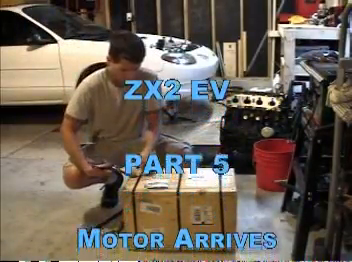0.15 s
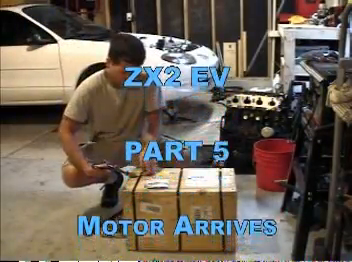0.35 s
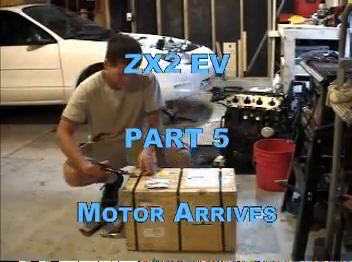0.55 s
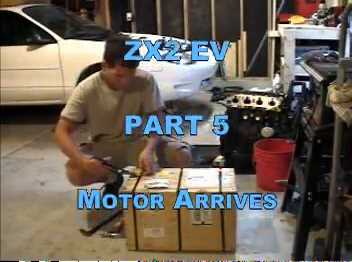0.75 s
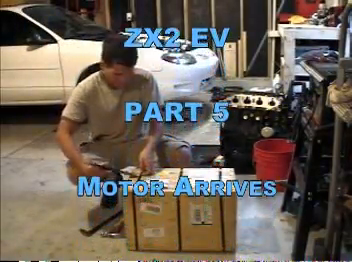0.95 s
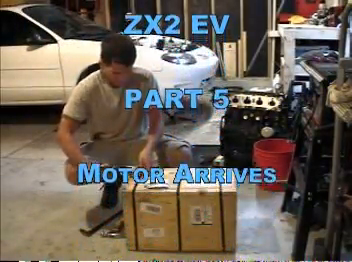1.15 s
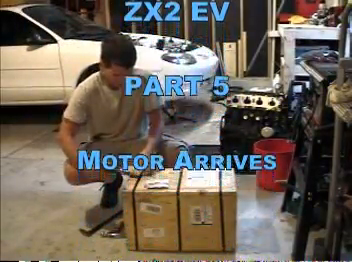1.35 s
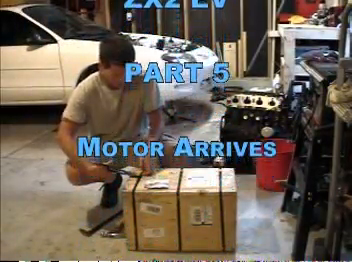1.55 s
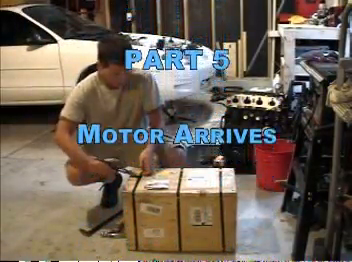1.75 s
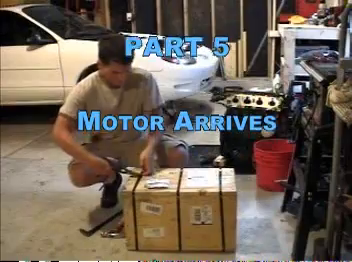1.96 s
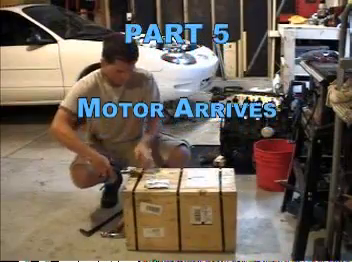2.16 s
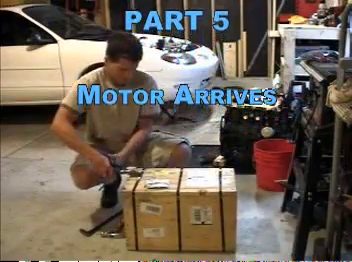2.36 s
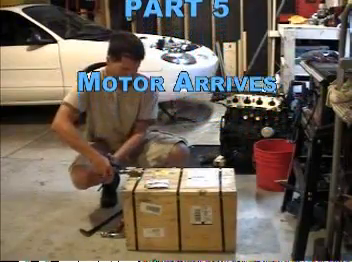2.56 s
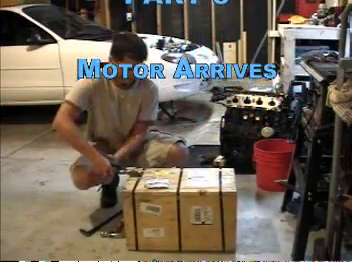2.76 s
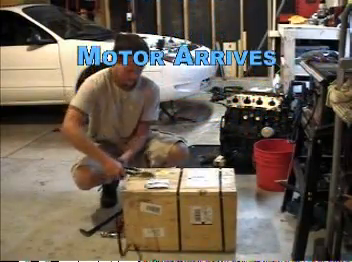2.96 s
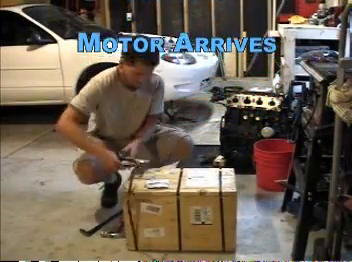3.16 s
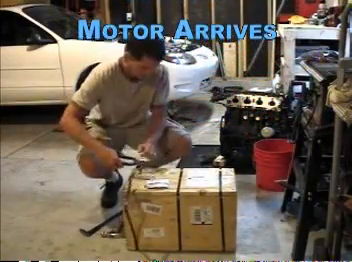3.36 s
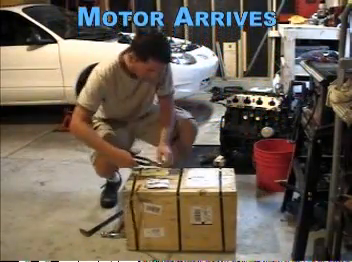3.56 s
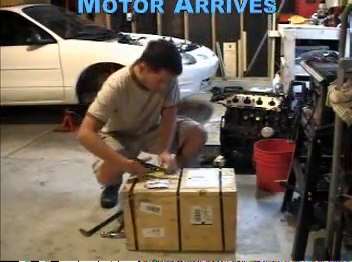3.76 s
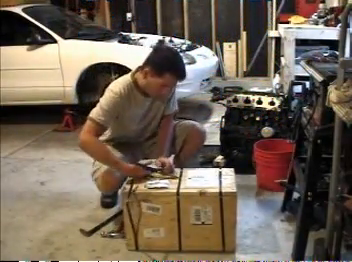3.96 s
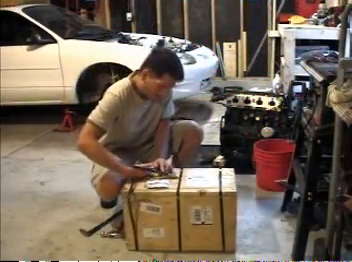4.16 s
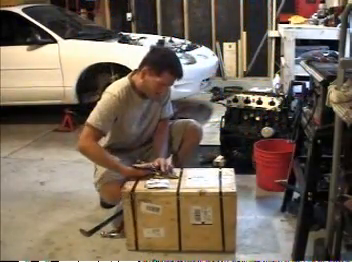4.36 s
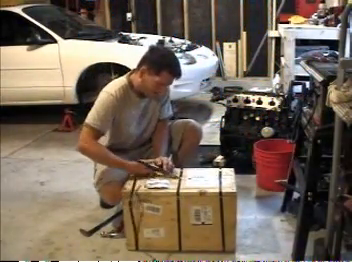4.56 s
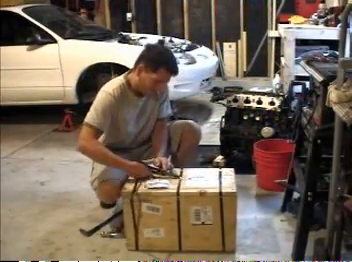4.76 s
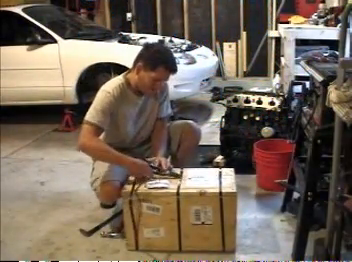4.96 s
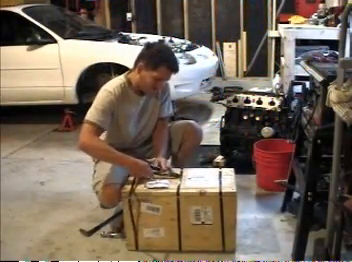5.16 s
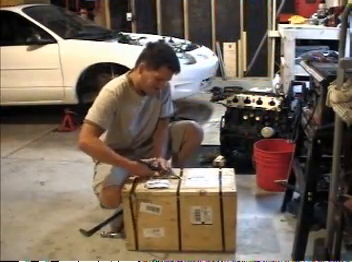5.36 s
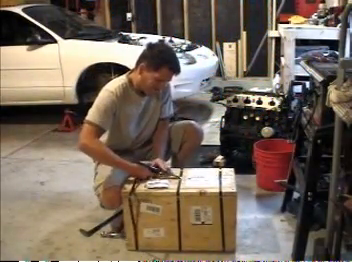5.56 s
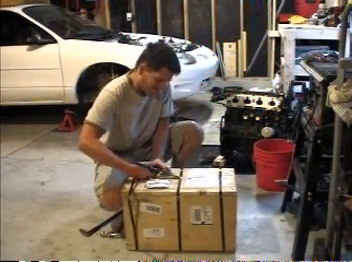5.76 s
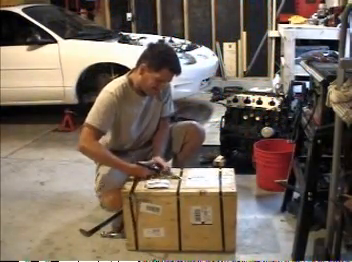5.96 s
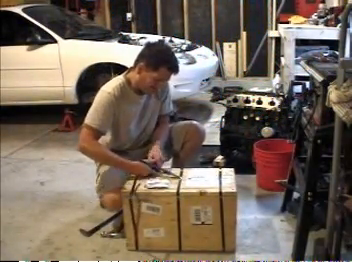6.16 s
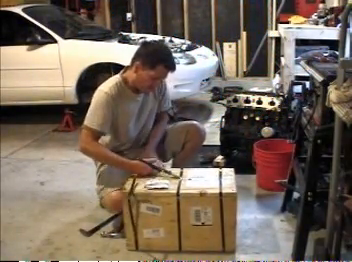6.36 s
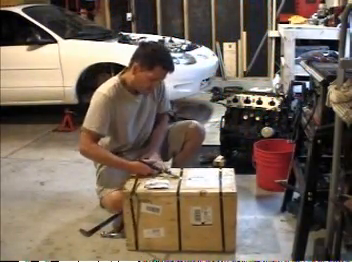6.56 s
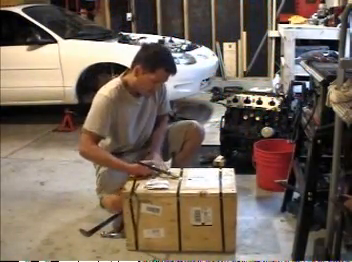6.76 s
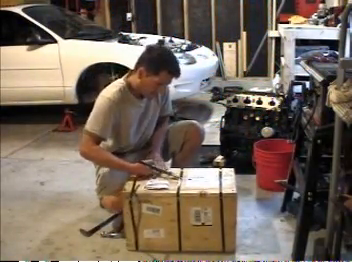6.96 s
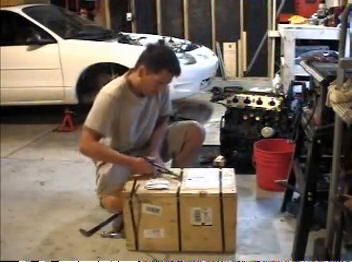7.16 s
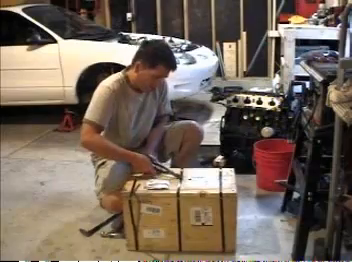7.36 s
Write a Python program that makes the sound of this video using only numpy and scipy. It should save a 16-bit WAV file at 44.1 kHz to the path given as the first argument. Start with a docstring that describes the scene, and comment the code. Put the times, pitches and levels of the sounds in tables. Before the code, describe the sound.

Steady hiss, faint wavering hum and a thin high camera whine sit beneath close garage work. A tool clicks and briefly rings against steel, hands rub hollow plywood, then a tensioned strap lets go with a distorted crack, a push of air and whipping metallic rattle. Bright clacks and scraping come after, then small knocks, a quieter lull, and a sharp click with strap scraping at the end. Short hard-walled reverberation.

```python
"""Steel straps come off a plywood crate by hand tool in a concrete garage: bursts of micro-impacts excite panels,
steel and walls as knocks, clicks and scuffs. Stick-slip noise makes the rubbing and scraping, decaying sines the
ringing tool. One strap snaps loud enough to overload the tape camera, pushes the air and thrashes as resonant
rattle. Behind lie room tone, hiss, a low hum and the camera motor's thin whine; a comb of notches at the head
drum's rate is cut into everything but the whine and the push of air."""
import sys
import numpy as np
from scipy import signal
from scipy.fft import rfft, irfft, next_fast_len
from scipy.io import wavfile
from scipy.ndimage import map_coordinates

SR = 44100
rng = np.random.default_rng(int(sys.argv[2]) if len(sys.argv) > 2 else 0)


def digitize_waveform(pressure):
    """Quantize a signal to 16-bit integers and store it at the path in sys.argv[1].

    Rows of a 2-D input are taken as channels; values are limited to [-1, 1].
    """
    field = np.atleast_2d(pressure).T
    bounded = np.clip(field, -1, 1)
    quanta = np.round(bounded * 32767).astype(np.int16)
    wavfile.write(sys.argv[1], SR, quanta)


N = 326340  # length [samples]
SNAP_S = 2.91  # the strap lets go


def amp(db):
    """Decibels to gain."""
    return 10 ** (np.asarray(db) / 20)


def unit(x):
    """Scale to rms 1."""
    return x / np.sqrt(np.mean(x ** 2) + 1e-20)


def along(points, hz):
    """Read (frequency [Hz], value) points on a log frequency axis."""
    f, values = np.transpose(points)
    return np.interp(np.log(hz + 1), np.log(f + 1), values)


def curves(rows):
    """One value per sample for each column after the time."""
    times, *columns = np.transpose(rows)
    return [np.interp(np.arange(N) / SR, times, column) for column in columns]


def wobble(rate):
    """A smooth random curve through `rate` knots a second."""
    knots = rng.standard_normal(int(N * rate / SR) + 4)
    return map_coordinates(knots, [np.arange(N) * rate / SR])


def filtered(x, response):
    """Multiply the spectrum of x by a complex response of frequency."""
    n = x.shape[-1]
    padded = next_fast_len(n + 8192)
    spectrum = rfft(x, padded) * response(np.fft.rfftfreq(padded, 1 / SR))
    return irfft(spectrum, padded)[..., :n]


def resonance(f, hz, width):
    """Causal resonance of peak gain 1, its width in Hz."""
    return 1j * f * width / (hz * hz - f * f + 1j * f * width)


def spread(pair, spectrum):
    """Colour two unrelated signals and mix them until left and right are as alike as at the two microphone ports."""
    # likeness of the two ports: (frequency [Hz], left-right correlation)
    alike = [(60, 0.99), (180, 1.0), (550, 0.99), (1650, 0.96), (4970, 0.86), (15000, 0.57)]

    def mid_side(hz):
        angle = np.arccos(np.clip(along(alike, hz), -1, 1)) / 2
        return amp(along(spectrum, hz)) * [np.cos(angle), np.sin(angle)]

    mid, side = filtered(pair, mid_side)
    return np.array([mid + side, mid - side])


def room_tone():
    """Steady coloured noise: the garage's room tone together with the camera's hiss."""
    # (frequency [Hz], relative level [dB per Hz])
    colour = [(12, -35), (20, -4.5), (97, 3.5), (159, 1), (226, -0.5), (305, 0), (751, -14.5),
              (1440, -10.5), (1950, -16), (4420, -17.5), (5340, -10), (6290, -23), (9730, -19),
              (11200, -39), (13500, -34)]
    level_db = -51.5  # rms
    return amp(level_db) * unit(spread(rng.standard_normal((2, N)), colour))


def hum():
    """A low sine that comes and goes, its pitch wavering about 105.5 Hz."""
    # (time [s], peak level [dB])
    swells = [(0.0, -51.5), (0.45, -75), (0.9, -54), (1.15, -74), (1.96, -49.5), (2.31, -52), (2.45, -84),
              (3.6, -56), (4.2, -57), (4.9, -59.5), (5.05, -62), (5.7, -50), (5.93, -62), (6.43, -47.5),
              (7.4, -58)]
    hz = 105.5 + 1.7 * wobble(7.9)
    return amp(curves(swells)[0]) * np.sin(2 * np.pi * np.cumsum(hz) / SR)


def whine():
    """Thin steady lines of the camera's drum motor, each wavering slightly in level."""
    # motor lines: (frequency [Hz], peak level before wavering [dB])
    lines = [(4194, -75), (4441, -74), (4635, -75), (4797, -72), (5017, -71), (5184, -66), (5243, -60),
             (5394, -62), (5545, -70), (5577, -71), (5771, -68), (6126, -77), (6293, -78), (6745, -69),
             (7165, -78), (7494, -79), (7623, -75), (8070, -68), (8091, -68), (8172, -72), (8393, -75),
             (8624, -69), (9222, -79), (9410, -71), (9507, -77), (9593, -75), (9889, -81), (10191, -75),
             (10492, -78), (10788, -79)]
    t = np.arange(N) / SR
    out = np.zeros((2, N))
    for hz, db in lines:
        phase = rng.normal(0, 0.71, (2, 1))  # each side has its own [rad]
        out += amp(db + 1.2 * wobble(4.8)) * np.sin(2 * np.pi * hz * t + phase)
    return out


def friction(spectrum, rate, grain_db, lumpy_db):
    """Stick-slip grains of scattered size, `rate` a second, over a noise bed for their reverberation; rms 1."""
    present = rng.random(N) < rate / SR
    size = amp(grain_db * np.minimum(rng.exponential(size=N), 3))
    grains = present * size * rng.standard_normal((2, N))
    bed = rng.standard_normal((2, N))
    return unit(amp(lumpy_db * wobble(25)) * spread(0.79 * unit(grains) + bed, spectrum))


def handling():
    """Hands and tool rub the plywood and drag the strap by friction; the lashing strap does both too."""
    # hands busy on the crate: (time [s], plywood rubbing [dB], strap scraping [dB])
    hands = [(0.0, -56.5, -54), (0.8, -62, -58), (1.21, -51, -56), (1.63, -60.5, -54), (1.96, -40, -53),
             (2.1, -42.5, -59), (2.33, -50, -53), (2.9, -64, -60), (3.5, -73, -81), (3.71, -35.5, -34),
             (3.9, -40.5, -42.5), (4.1, -61, -61), (4.3, -53, -51), (4.68, -47, -53.5), (4.8, -43.5, -38),
             (4.9, -45.5, -45), (5.09, -41.5, -43.5), (5.27, -52, -60), (6.18, -55.5, -52), (6.3, -45, -49),
             (6.47, -52.5, -57.5), (7.14, -52, -54), (7.19, -46, -29.5), (7.32, -35.5, -39),
             (7.4, -38, -36)]
    # rubbed plywood: (frequency [Hz], relative level [dB per Hz])
    plywood = [(71, -78), (120, -20.5), (223, -4), (296, -3), (362, -1), (542, -5), (835, -4), (3000, -33),
               (3900, -63), (6600, -120)]
    # scraped steel strap: (frequency [Hz], relative level [dB per Hz])
    steel = [(350, -18), (600, -9), (1280, 3), (1650, -2), (2750, -6.5), (4650, -19.5), (9620, -22),
             (12800, -47), (15000, -88)]
    shake_db, drag_db = -9, -6.5  # plywood and strap re the strap's rattle
    ply_db, strap_db = curves(hands)
    rubbing = friction(plywood, 200, grain_db=4.0, lumpy_db=-2.0)
    scraping = friction(steel, 350, grain_db=0.5, lumpy_db=3.0)
    return ((amp(ply_db) + amp(shake_db) * lashing()) * rubbing
            + (amp(strap_db) + amp(drag_db) * lashing()) * scraping)


def garage(length):
    """A fresh stereo reverberation tail, left energy 1; noise in which each frequency dies at its own speed."""
    # concrete garage: (frequency [Hz], time to fall 60 dB [s])
    decay = [(100, 0.42), (260, 0.37), (700, 0.51), (1840, 0.61), (4850, 0.58), (12800, 0.47)]
    hz, t, bins = signal.stft(rng.standard_normal((2, length)), SR, nperseg=256)
    bins = bins * amp(-60 * t / along(decay, hz)[:, None])
    tail = signal.istft(bins, SR, nperseg=256)[1][:, :length]
    build_up = 1 - np.exp(-np.arange(length) / SR / 0.00074)
    tail = spread(tail * build_up, [(60, -2.5), (200, 3), (3000, -3.5), (12000, -3.0)])
    return tail / np.linalg.norm(tail[0])


def crate_voice(panel_hz, excess_db):
    """Response of the plywood crate: the struck panel's own mode plus shared modes in freshly scattered shares."""
    # shared panel modes: (frequency [Hz], width [Hz], level before tilt and scatter [dB])
    modes = [(254, 68, -2), (340.3, 50.5, 6.5), (466, 55, -3), (668, 220, -3.5), (840, 110, -3.5)]
    shares = amp(rng.normal(0, 1.8, len(modes)))
    # a soft blow, its knock outweighing its clang, leaves the upper modes out [dB per octave]
    tilt_db = 1 - 0.48 * np.clip(excess_db, 0, 30)

    def voice(f):
        shared = 0
        for k, (share, (hz, width, level)) in enumerate(zip(shares, modes)):
            gain = share * amp(level + tilt_db * np.log2(hz / modes[0][0]))
            shared = shared + (-1) ** k * gain * resonance(f, hz, width)
        panels = 1.98 * resonance(f, panel_hz, 45.0) + 0.82 * shared
        # two low-passes at 1200 Hz, one high-pass at 150 Hz
        return panels / (1 + 1j * f / 1200) ** 2 * 1j * f / (150 + 1j * f)

    return voice


def contacts(table, rise, contact, room_db):
    """Each contact is a burst of micro-impacts that cracks, thumps the crate, clangs the steel and fills the garage."""
    # dry crack: (frequency [Hz], relative level [dB])
    crack = [(50, -42), (200, -11.5), (700, -2), (1500, -4.5), (3500, -7), (6000, -18.5), (8000, -35.5)]
    # bright edge of the contact: (frequency [Hz], relative level [dB])
    edge = [(4000, -11), (6500, -5), (10000, -8.5), (12500, -21), (15000, -59)]
    clang_width_hz = 170
    out = np.zeros((2, N + 2 * SR))
    t = np.arange(SR // 6) / SR - .001  # starts 1 ms ahead of the contact
    tail_length = SR * 5 // 8
    tick = 1. * (np.arange(len(t)) == np.argmax(t >= 0))
    for s, db, knock_db, panel_hz, clang_db, clang_hz, edge_db in table:
        burst = rng.standard_normal(len(t)) * np.exp(-t / contact) * (t >= 0) + 0.7 * tick
        voices = [lambda f: amp(along(crack, f)), crate_voice(panel_hz, knock_db - clang_db),
                  lambda f: resonance(f, clang_hz, clang_width_hz), lambda f: amp(along(edge, f))]
        levels = db + np.array([0, knock_db, clang_db, edge_db])
        # panels and steel feel the first blow most, and face the camera more than the walls
        first_blows, wall_dbs = (1.5, 21.0, 8.5, 0.71), (-0.5, -3.0, -2.5, -1.0)
        near, far = 0, 0
        for level, voice, first, wall_db in zip(levels, voices, first_blows, wall_dbs):
            direct, blended = filtered(np.array([burst + first * tick, tick]), voice)
            size = amp(level) / np.abs(direct).max()
            near = near + size * direct
            # the walls hear the contact from all sides, so only its smooth colour reaches them
            same_energy = np.linalg.norm(direct) / np.linalg.norm(blended)
            far = far + amp(wall_db) * size * blended * same_energy
        sound = amp(room_db) * signal.fftconvolve(far[None], garage(tail_length), axes=1)
        sound[:, :len(t)] += near
        onset = 1 - np.exp(-np.arange(sound.shape[1]) / SR / rise)
        at = round((s + t[0]) * SR)
        out[:, at:at + sound.shape[1]] += sound * onset
    return out[:, :N]


def hits():
    """Knocks, clicks and the snap: contacts that strike with a rise of 0.3 ms."""
    # (time [s], crack peak before the rise [dB], knock re crack [dB], panel mode [Hz], clang re crack [dB],
    #  clang [Hz], edge re crack [dB])
    blows = [(0.056, -28.5, -4.5, 316, -23, 2610, -10.5), (0.0738, -44.5, 15, 375, -4, 720, -19),
             (0.7175, -12, -47, 720, -33.5, 700, -7), (1.6396, -36, -2, 362, 5.5, 1080, -27),
             (1.8742, -18.5, -14.5, 268, -16, 2030, -12), (1.941, -29, -0.5, 545, -12, 955, -33),
             (1.972, -20, -8, 256, -8, 1380, -40), (2.1095, -22.5, -5, 667, 7.5, 2310, -9),
             (2.2263, -36.5, 10.5, 256.2, 2, 720, -32), (2.2993, -39.5, 5, 242, -8, 700, -23),
             (2.9097, 4.5, -16, 660, -11, 1160, -6), (3.2626, -8, -30, 910, -18, 1140, 0.5),
             (3.2718, -10, -14.5, 390, -36, 1620, 9.5), (3.708, -15, -9, 390, -43, 1850, -3),
             (3.9138, -41.5, 29.5, 333, 2, 840, -15), (3.9448, -40, 23.5, 252, -2, 840, -16),
             (4.0665, -35.5, 3, 268, -20, 950, -10), (4.353, -30.5, 7.5, 363, 7.5, 1030, -41),
             (4.7603, -30.5, -14, 398, -6, 2250, -13), (4.7839, -26.5, -6, 252, -12, 1270, -14),
             (4.8641, -37, -19, 805, 2, 2530, -10), (4.9136, -24, -39, 894, 8, 1700, -40),
             (4.9338, -19, -23, 226, -22, 1720, -9), (5.005, -27, -24, 786, 10, 1530, -10),
             (5.256, -16.5, -17, 770, -11.5, 2250, -7.5), (5.2898, -34.5, 5.5, 223, -2, 716, -21),
             (5.4783, -42.5, 20, 395, 16.5, 810, -31), (5.676, -31, -29, 807, -6, 760, -30),
             (5.7418, -40, -22, 859, -18, 859, -23), (6.1441, -43.5, 14, 360, 12, 835, -23),
             (6.216, -45, 5, 378, 8, 710, -22), (6.6622, -46, 16.5, 288, 11.5, 820, -20),
             (7.1429, -10, -30, 860, -8, 2070, -19), (7.2096, -29, -25, 640, 2, 1110, -40),
             (7.3688, -29.5, 6.5, 333, -9, 860, 0)]
    return contacts(blows, rise=0.0003, contact=0.0064, room_db=1.94)  # times [s]


def scuffs():
    """Contacts that slide in instead of striking: the same bursts with a rise of 5.8 ms."""
    # (time [s], crack peak before the rise [dB], knock re crack [dB], panel mode [Hz], clang re crack [dB],
    #  clang [Hz], edge re crack [dB])
    slides = [(1.0994, -39, -1.5, 362, -10, 810, -4), (1.2314, -40.5, -8, 261, -1, 974, -16),
              (1.2893, -45.5, 8.5, 820, -5, 810, -14), (1.709, -34, -14, 404, -11, 840, -22),
              (1.8172, -51.5, 11, 320, -8, 867, -14), (2.7786, -42, -12, 237, -5, 1420, -14),
              (2.8474, -50, 4, 375, -13, 1560, -8), (3.239, -6, -32, 396, -12, 956, -11),
              (3.6725, -31.5, -12, 617, -14, 1100, -1), (4.025, -42.5, 11.5, 253, -3, 740, -4),
              (4.6217, -34.5, 2.5, 414, -6, 990, -16), (4.7321, -34, -1, 262, -15, 1560, -10),
              (4.812, -27.5, -20, 248, -9, 1300, -3), (5.1634, -48, -9, 824, -1, 805, -21),
              (5.8869, -40, -3, 840, 2, 1620, -10), (5.9294, -35.5, -15, 844, -6, 1250, -20),
              (6.3041, -29, -10, 835, 4, 1240, -18), (6.685, -51, 17, 200, -15, 821, -20),
              (6.9913, -38.5, 5.5, 360, 2, 1150, -5)]
    return contacts(slides, rise=0.0058, contact=0.0077, room_db=4)  # times [s]


def tool():
    """The steel tool rings on after a glancing knock as decaying sines; the grip makes each mode waver."""
    # the tool left free to ring: (time [s], level [dB], modes above 1 kHz [dB])
    pings = [(2.11, -29, 0), (2.227, -35, -10)]
    # steel modes: (frequency [Hz], relative level [dB], time to fall 60 dB [s])
    modes = [(678, -2, .3), (818, -12, .3), (1990, -5, .22), (2234, -4, .24), (2505, -2, .3),
             (2615, 0, .34), (4285, -18, .2)]
    out = np.zeros(N + SR)
    t = np.arange(SR // 2) / SR
    for s, db, upper_db in pings:
        for hz, level, t60 in modes:
            waver = np.cumsum(rng.standard_normal(len(t))) * .012  # phase drift [rad]
            mode_db = db + level + upper_db * (hz > 1000)
            size = amp(mode_db - 60 * t / t60) * (1 - np.exp(-t / 0.0014))
            out[round(s * SR):][:len(t)] += size * np.sin(2 * np.pi * hz * t + waver)
    return out[:N]


def jolt():
    """The snap's slow push and rebound of air: one smooth pulse, first one way and then the other."""
    scale_db, length_s = -12.5, 0.0075  # scale of the pulse, not its peak; time constant
    u = np.clip(np.arange(N) / SR - SNAP_S, 0, 1) / length_s
    return amp(scale_db) * u * (2 - u) * np.exp(-u)


def lashing():
    """Gain of the freed strap's whipping: each lash swells fast and fades slowly, the first starting with the snap."""
    # whips of the strap: (time when fullest [s], level [dB])
    lashes = [(2.918, -13.5), (2.996, -12), (3.07, -15.5), (3.15, -19.5), (3.26, -23), (3.328, -18)]
    swell, fade = 490, 100.5  # dB per second
    t = np.arange(N) / SR
    each = [db - np.where(t < s, swell * (s - t), fade * (t - s)) for s, db in lashes]
    return amp(np.max(each, axis=0)) * (t > SNAP_S)


def thrash():
    """Dense rattling of the loose strap: crowded grains lifted at the steel's resonances."""
    # loose strap's rattle: (frequency [Hz], relative level [dB per Hz])
    loose = [(30, -86), (71, -48), (120, -11.5), (234, 1.5), (387, -6), (446, -31), (557, -1.5),
             (1130, 0.5), (3870, -6.5), (10200, -30), (12300, -40.5), (15000, -51)]
    # the strap's strongest resonances: (frequency [Hz], width before narrowing by 0.89 [Hz])
    flex = [(237, 25), (565, 30), (1130, 87), (1590, 93), (2480, 14), (2620, 7.1), (2940, 12), (3720, 16),
            (3850, 66), (4020, 34), (4600, 58), (4870, 29), (8190, 160)]
    rattle = friction(loose, 1500, grain_db=.8, lumpy_db=1.2)
    rattle = filtered(rattle, lambda f: 1 + 0.89 * sum(resonance(f, hz, 0.89 * width) for hz, width in flex))
    return lashing() * unit(rattle)


def drum_notches(hz):
    """Comb response with a notch at every multiple of the head drum's rate, from one delayed turn fed both ways."""
    drum_hz = 150.05
    turn = np.exp(-2j * np.pi * hz / drum_hz)
    return (1 - 0.88 * turn) / (1 - 0.41 * turn)


def scene():
    """Everything in the garage through the drum's notches, plus the whine and the push of air left unnotched."""
    heard = room_tone() + hum() + handling() + hits() + scuffs() + tool() + thrash()
    return filtered(heard, drum_notches) + whine() + jolt()


def record(dry):
    """The two sides lean a little and the top treble falls away, loud peaks clip softly, then the band is cut off."""
    # overall treble roll-off of the sound: (frequency [Hz], level [dB])
    treble = [(20, -1), (11500, -0.5), (13000, -7), (14500, -30), (16000, -42)]
    # balance of the two sides: (frequency [Hz], left minus right [dB])
    lean = [(60, -1), (240, -0.5), (950, -1.0), (3770, 0.0), (15000, 2)]
    top_hz = 15600
    sides = np.array([[.5], [-.5]])
    x = filtered(dry, lambda hz: amp(along(treble, hz) + along(lean, hz) * sides))
    x = x / (1 + np.abs(x) ** 8) ** (1 / 8)
    return filtered(x, lambda hz: hz < top_hz)


dry = scene()
out = record(dry)
digitize_waveform(out)
```